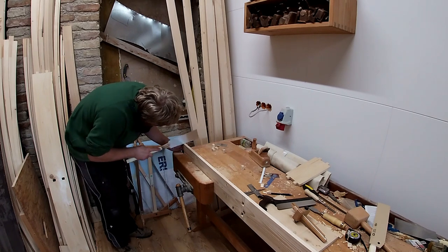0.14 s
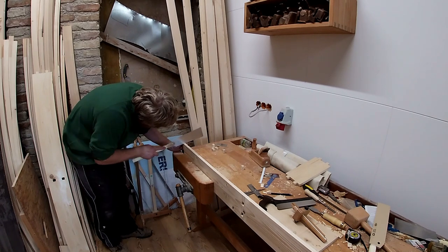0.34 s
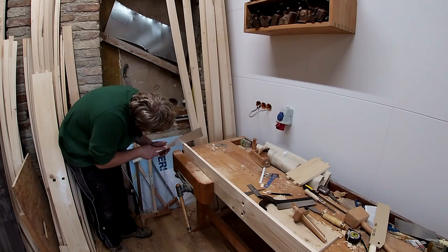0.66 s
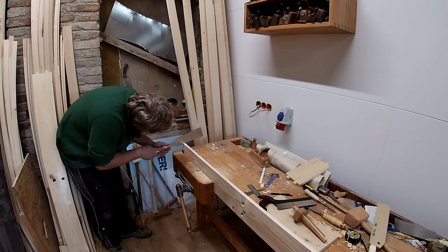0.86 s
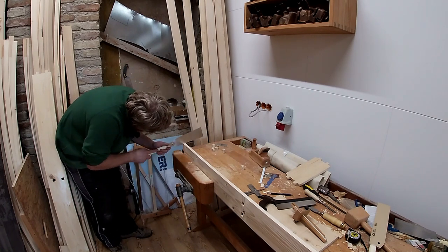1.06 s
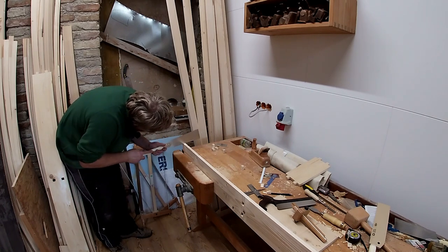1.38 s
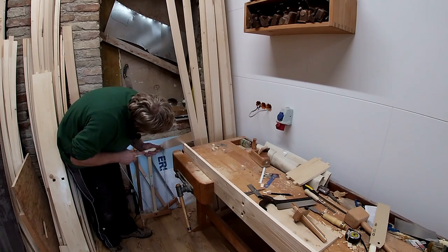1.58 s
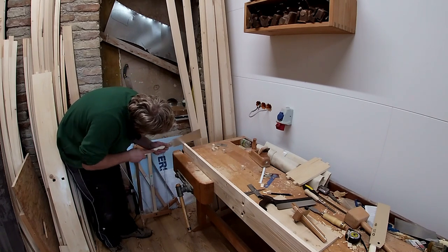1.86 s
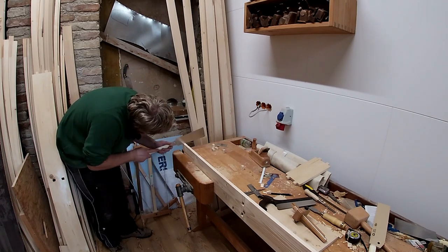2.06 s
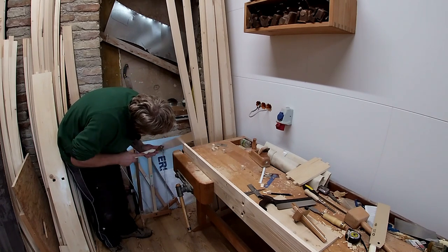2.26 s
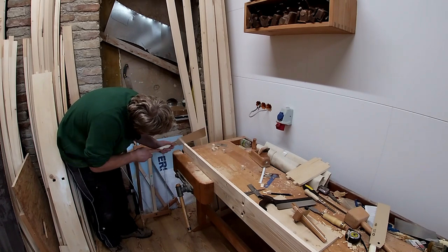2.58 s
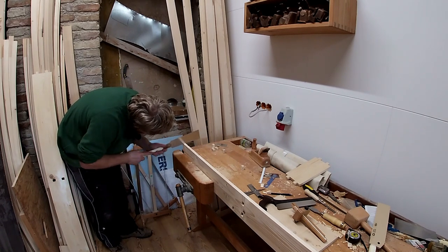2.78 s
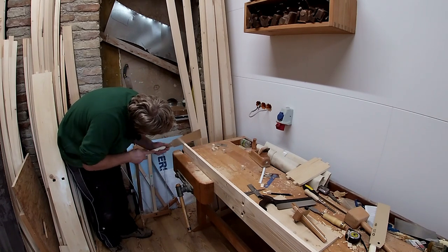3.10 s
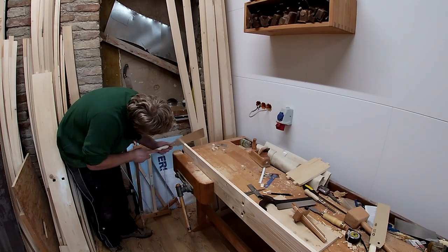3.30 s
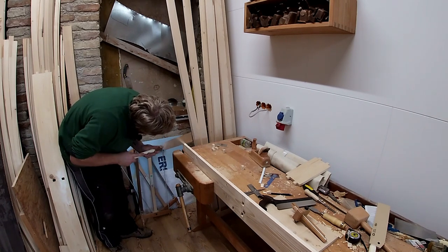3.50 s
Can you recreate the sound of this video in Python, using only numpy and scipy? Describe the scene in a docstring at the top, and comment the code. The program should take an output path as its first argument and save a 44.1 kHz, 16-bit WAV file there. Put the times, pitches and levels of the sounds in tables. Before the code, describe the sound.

A hand saw cuts a wooden board at a workbench. A quieter rasping stroke fades by 0.45 s; small woody knocks and a light hissing drag follow, with a very faint high whistle near 1.2 s. From 1.3 s to the end, stronger uneven strokes grate and buzz, peaking around 1.4, 2.1 and 3.35 s, with hard tooth catches and low board chatter. Close pickup, small room, short reflections.

```python
"""Rasp on a clamped board

A rasp works back and forth on a board clamped to a workbench in a small workshop.
Teeth tear fibres as dense grains through board and rasp responses; the board chatters near 145 Hz under load.
The pause after the first stroke holds small knocks on wood, a light drag of the rasp and a faint whistle.
Hard catches of the teeth punctuate the strokes; bench shake, room tone and wall reflections surround it."""
import sys
import numpy as np
from scipy import signal
from scipy.fft import rfft, irfft, next_fast_len
from scipy.io import wavfile
from scipy.ndimage import uniform_filter1d, map_coordinates

SR = 44100
rng = np.random.default_rng(int(sys.argv[2]) if len(sys.argv) > 2 else 0)


def master_out(mix):
    """Clip the mix to full scale and print it as 16-bit PCM to the path in sys.argv[1]."""
    frames = np.transpose(np.atleast_2d(mix))
    ceiling = np.clip(frames, -1, 1)
    pcm = np.round(ceiling * 32767).astype(np.int16)
    wavfile.write(sys.argv[1], SR, pcm)


def field_ratio(decibels):
    """Amplitude ratio for a level in dB (20 dB per decade); scalars and array-likes work."""
    return 10 ** (np.asarray(decibels, dtype=float) / 20)


N = 160965

# quiet room tone, middle and side: f/Hz, relative level per Hz/dB
ROOM_TONE = [(25, 5), (150, -1), (298, -4), (450, 10.5), (949, -4), (4780, -9.5), (9000, -20), (15600, -44)]
SIDE_TONE = [(25, -1), (300, -1), (15000, -8)]
# decay of the wall reflections: f/Hz, t60/s
WALL_DECAY = [(150, 0.49), (1000, 0.29), (4000, 0.29), (12000, 0.22)]
# diffuse side colour, before its trim: f/Hz, side over mid/dB
SIDE_COLOUR = [(60, -19), (150, -44.5), (400, -42), (1200, -30), (2400, -19), (8000, -7), (15000, 4)]
# colour of the bench shake: f/Hz, relative level/dB
SHAKE_COLOUR = [(20, -33), (40, -9), (70, -4.5), (100, 3.5), (130, -29.5)]
# faint whistle before the run of strokes: t/s, level/dB, f/Hz
WHISTLE = [(1.145, -70, 10450), (1.246, -69, 10340), (1.285, -72, 9750)]
# light drag of the rasp: t/s, level/dB
DRAG_LEVEL = [(.875, -63), (.905, -57), (1.04, -55), (1.065, -52), (1.13, -55.5), (1.165, -75)]
# colour of that drag: f/Hz, relative level per Hz/dB
DRAG_TIMBRE = [(200, -16), (500, -4.5), (1300, -9.5), (2600, -15), (4500, -7.5), (8500, -13), (15600, -24)]
# board and bench resonances: f/Hz, width/Hz, relative level/dB
BOARD_MODES = [(263.5, 39, -1), (331, 21, 2), (397, 18.5, -1), (437, 15.7, 4.5), (508.6, 45.5, -0.5),
               (650.4, 26, 6), (822, 86, -8.5), (980, 72, -3.5), (1085, 79, -4), (1291, 65, -1),
               (1744, 310, -18.5), (2407, 110, -16), (3790, 176, -23.5), (5220, 50, -28)]
# what passes between the resonances: f/Hz, relative level/dB
BETWEEN_MODES = [(90, -53), (130, -37), (250, -6), (700, -14), (1400, -18.5), (2500, -29.5), (5000, -57.5)]
# one resonance that rings only with the lowered ones: f/Hz, width/Hz, relative level/dB
LOWERED_MODE = (374, 26, 8)
# small bumps on wood: t/s, level before trim/dB, brightness/(dB per octave), contact/ms
WOOD_KNOCKS = [(0.5245, -27, 4.5, 1.84), (0.6532, -26.5, 3.5, 1.82), (0.927, -35.5, 0, 13.7),
               (1.053, -34.5, 8, 8), (1.152, -27.5, 2.5, 9), (1.242, -34.5, 4, 4.8)]
# teeth catching hard in the wood, same columns
TOOTH_CATCHES = [(0.256, -21, 4.8, 3.6), (1.289, -25, 3.04, 11), (1.438, -11.5, 1.29, 2.9),
                 (2.074, -18, 2.6, 4), (2.687, -23, 2.97, 4), (3.282, -25, 2.8, 3.36)]
# rasp colour: f/Hz, relative level per Hz/dB
RASP_COLOUR = [(1180, -75), (2000, -7), (2440, 1.5), (2950, -7), (3750, -7.5), (4120, -7), (5710, -9.5),
               (10500, -21), (13000, -32), (15600, -37)]
# chatter overtones: multiple of the chatter pitch, mean level over the fundamental/dB
OVERTONES = [(2, -14.5), (3, -18.5)]
# rasp pressure, first stroke then the run of strokes: t/s, level before trim/dB,
# treble over it before trim/dB
STROKE_PRESSURE = [
    [(0.0, -38.5, -18), (0.056, -33, -11), (0.228, -30.5, -10.5), (0.252, -28.5, -12), (0.36, -45, -9.5),
     (0.415, -49.5, -3.5), (0.44, -51, -19)],
    [(1.292, -36.5, -4.5), (1.32, -27, -11), (1.42, -17.5, -19.5), (1.44, -22, -7.5), (1.46, -20, -22),
     (1.56, -24.5, -14.5), (1.65, -38, -17), (1.69, -33, -10.5), (1.79, -24, -17.5), (1.95, -26, -16),
     (1.98, -20.5, -21.5), (2.03, -34.5, -39), (2.05, -36, -19), (2.1, -20, -14), (2.12, -14, -21),
     (2.28, -26.5, -18), (2.36, -42, -18), (2.43, -40, -8.5), (2.5, -33.5, -15.5), (2.55, -36.5, -11.5),
     (2.59, -32.5, -15), (2.67, -51, -12), (2.72, -25.5, -18), (2.8, -23.5, -16), (2.9, -26.5, -15.5),
     (2.96, -31.5, -30), (2.98, -36.5, -14), (3.07, -32.5, -9.5), (3.17, -31, -19), (3.27, -40.5, -16),
     (3.33, -18.5, -18.5), (3.42, -20.5, -20), (3.58, -39, -19), (3.65, -36.5, -8.5)],
]
# lowest board mode, same two spans: t/s, level/dB, f/Hz
CHATTER_PATH = [
    [(0.0, -37, 158), (0.046, -33, 156.5), (0.138, -24, 153.9), (0.356, -29, 154), (0.5, -63, 160.2)],
    [(1.27, -60, 145.9), (1.31, -34.5, 146.2), (1.36, -20.5, 145.5), (1.61, -32.5, 155.3),
     (1.8, -30.5, 154.4), (1.87, -36, 147.8), (1.96, -18, 151.9), (2.06, -28.5, 149.1), (2.1, -13.5, 138.7),
     (2.13, -25.5, 134.9), (2.2, -14, 140.1), (2.28, -19.5, 140.4), (2.35, -38, 149.7), (2.65, -46.5, 157),
     (2.73, -33, 143.9), (2.83, -15, 143.1), (2.89, -18.5, 143.1), (3.03, -35.5, 155.4), (3.26, -38, 153.9),
     (3.32, -24.5, 145.5), (3.41, -13, 143), (3.52, -30.5, 142), (3.65, -48, 153.2)],
]
# second board mode, same two spans: t/s, level/dB
SECOND_LEVEL = [
    [(0.0, -49), (0.036, -30), (0.302, -30.5), (0.5, -61)],
    [(1.27, -59), (1.3, -35.5), (1.39, -18.5), (1.58, -24), (1.69, -40), (1.79, -15.5), (1.84, -35.5),
     (1.99, -22), (2.06, -34.5), (2.11, -21), (2.14, -30.5), (2.6, -39), (2.67, -47), (2.7, -32),
     (2.87, -25.5), (2.93, -36.5), (3.28, -35), (3.32, -19.5), (3.62, -48), (3.65, -34)],
]

SECOND_HZ = 207.7


def unit(x):
    """Scaled to rms 1."""
    return x / np.sqrt(np.mean(x ** 2) + 1e-20)


def along(points, hz):
    """(f/Hz, value) points read on a log frequency axis."""
    f, v = np.transpose(points)
    return np.interp(np.log(hz + 1), np.log(f + 1), v)


def curves(rows):
    """One value per sample for each column after the time."""
    s, *cols = np.transpose(rows)
    return [np.interp(np.arange(N) / SR, s, c) for c in cols]


def lifted(spans):
    """Joins the stroke tables, silencing them while the rasp is off the wood."""
    first, run = spans
    off = [(s, -90, *row[2:]) for s, row in ((.56, first[-1]), (1.25, run[0]))]
    return curves(list(first) + off + list(run))


def wobble(rate):
    """A smooth random curve, rate knots a second."""
    knots = rng.standard_normal(int(N * rate / SR) + 4)
    return map_coordinates(knots, [np.arange(N) * rate / SR])


def filtered(x, response):
    """x shaped by a complex response of frequency."""
    m = next_fast_len(N + SR // 2)
    return irfft(rfft(x, m) * response(np.fft.rfftfreq(m, 1 / SR)), m)[..., :N]


def coloured(x, points):
    """x through a (f/Hz, level/dB) colour, brought to rms 1."""
    return unit(filtered(x, lambda f: field_ratio(along(points, f))))


def modes(f, table):
    """Causal response of (f/Hz, width/Hz, level/dB) resonances in alternating polarity."""
    total = 0
    for k, (c, w, db) in enumerate(table):
        total = total + (-1) ** k * field_ratio(db) * 1j * f * w / (c * c - f * f + 1j * f * w)
    return total


def board(f):
    """The board's modes, thinned in the bass, plus what passes between them."""
    return modes(f, BOARD_MODES) * f ** 2 / (f ** 2 + 220 ** 2) + field_ratio(along(BETWEEN_MODES, f))


def grains(rate, spread_db):
    """Random clicks of scattered size and polarity, rate a second, rms 1."""
    u, size, sign = rng.random(N), rng.standard_normal(N), np.sign(rng.standard_normal(N))
    return unit((u < rate / SR) * sign * field_ratio(spread_db * np.clip(size, -2, 2)))


def room_tone(colour, db):
    """Quiet coloured noise with a slowly wavering level."""
    return field_ratio(db + 1.1 * wobble(7.9)) * coloured(rng.standard_normal(N), colour)


def room(x):
    """Wall answer; each frequency dies at its own speed, and two tails blend at random."""
    hz, t, z = signal.stft(rng.standard_normal((2, SR // 2)), SR, nperseg=256)
    decay = field_ratio(-60 * t / along(WALL_DECAY, hz)[:, None])
    tails = signal.istft(z * decay, SR, nperseg=256)[1]
    blend = np.pi / 2 * wobble(4)
    parts = np.pad(x * [np.cos(blend), np.sin(blend)], ((0, 0), (200, 0)))
    return signal.fftconvolve(parts, tails / np.linalg.norm(tails[0]), axes=1).sum(axis=0)[:N]


def bench_shake():
    """Low noise from the shaking bench partly follows the rasp's pressure."""
    stroke_db, _ = lifted(STROKE_PRESSURE)
    level_db = -52 + 0.46 * (np.maximum(stroke_db, -60) + 27.5)
    return coloured(rng.standard_normal(N), SHAKE_COLOUR) * field_ratio(level_db + 4.0 * wobble(8.62))


def whistle():
    """A thin, falling sine whose level flickers."""
    level_db, hz = curves(WHISTLE)
    s = np.arange(N) / SR
    sounding = 1. * (s > WHISTLE[0][0]) * (s < WHISTLE[-1][0])
    on = uniform_filter1d(sounding, size=300)  # soft edges
    return on * field_ratio(level_db + 3 * wobble(40)) * np.sin(2 * np.pi * np.cumsum(hz) / SR)


def drag():
    """The rasp slides back without pressure: a thin, slightly gritty hiss."""
    level_db, = curves([(.8, -100)] + list(DRAG_LEVEL) + [(1.24, -100)])
    hiss = rng.standard_normal(N) + 1.1 * grains(1600, 2.9)
    return field_ratio(level_db + 2.0 * wobble(29.9)) * coloured(hiss, DRAG_TIMBRE)


def knocks_and_catches():
    """A short rough contact, soft or hard, rings the board's modes."""
    push = 1.64  # smooth shove against a roughness of 1
    out, t = np.zeros(N), np.arange(SR // 8) / SR
    for s, db, bright_db, ms in list(WOOD_KNOCKS) + list(TOOTH_CATCHES):
        u = t * 1000 / max(ms, 1)
        blow = np.zeros(N)
        blow[round(s * SR):][:len(t)] = u * np.exp(-u * u) * (push + rng.standard_normal(len(t)))

        def struck(f):
            tilt = field_ratio(bright_db * np.log2(np.clip(f, 150, 9000) / 400))
            return tilt * (board(f) + modes(f, [(SECOND_HZ, 60, 3)]) + modes(f, [(4960, 3500, -51.5)]))

        rung = filtered(blow, struck)
        out += field_ratio(db - 3.0) * rung / np.abs(rung).max()
    return out


def board_body(torn):
    """Torn grains drift at random between two mode sets; the first stroke leans to the lowered one."""
    shift = 0.038  # frequency ratio above 1 between the two sets
    first_lean = 3.7
    lean = 3 * wobble(4.02) + 2.46 - first_lean * (np.arange(N) < SR // 2)
    share = 1 / (1 + np.exp(lean))
    usual = filtered(torn * np.sqrt(1 - share), board)
    lowered = filtered(torn * np.sqrt(share), lambda f: board(f * (1 + shift)) + modes(f, [LOWERED_MODE]))
    return unit(usual + lowered)


def low_mode(torn, hz, width_hz):
    """Torn grains ring one low mode, its resonance applied twice."""
    return unit(filtered(torn, lambda f: modes(f, [(hz, width_hz, 0)]) ** 2))


def board_chatter(torn, turn, locked):
    """Weak chatter is noise in the lowest mode; strong chatter locks into a wavering hum with overtones."""
    loose = low_mode(torn, 150, 16)
    hum = np.cos(turn)
    for k, db in OVERTONES:
        hum = hum + field_ratio(db + 1.7 * wobble(23.86)) * np.cos(k * turn + wobble(14))
    hum = np.sqrt(2) * hum * field_ratio(1 * wobble(30.63))
    return np.sqrt(locked) * hum + np.sqrt(1 - locked) * loose


def rasp_fizz(torn, bite, fizz_db):
    """Torn fibres and finer grains fizz in the rasp; its top treble swings wider than the rest."""
    fizz = coloured(0.32 * torn + bite * grains(6000, 2.5), RASP_COLOUR)
    air = filtered(fizz, lambda f: 1 / (1 + (9050 / (f + 1)) ** 4))  # above about 9 kHz
    return fizz + air * (field_ratio(0.14 * np.clip(fizz_db + 49, -30, 10)) - 1)


def rasp():
    """Torn fibres ring board and rasp; the bite pulses with the board's chatter."""
    stroke_db, treble_db = lifted(STROKE_PRESSURE)
    chatter_db, chatter_hz = lifted(CHATTER_PATH)
    second_db, = lifted(SECOND_LEVEL)
    lock_db, wander_hz, cycle_bite, jerk_db = -34, 3.99, 0.29, 1.16
    turn = 2 * np.pi * np.cumsum(chatter_hz + wander_hz * wobble(40)) / SR
    locked = 1 / (1 + field_ratio(2 * (lock_db - chatter_db)))  # half locked at lock_db
    bite = (1 + cycle_bite * locked * np.cos(turn)) * field_ratio(jerk_db * wobble(44.914))
    torn = bite * grains(1800, 4)
    body = board_body(torn)
    second = low_mode(torn, SECOND_HZ, 45.3)
    chatter = board_chatter(torn, turn, locked)
    fizz = rasp_fizz(torn, bite, stroke_db + treble_db)
    bright = field_ratio(stroke_db) * (field_ratio(-0.5) * body + field_ratio(treble_db - 2.0) * fizz)
    return bright, field_ratio(chatter_db) * chatter + field_ratio(second_db) * second


def scene():
    """Two close microphones: nearly mono, with a diffuse side that grows in the treble."""
    bright, low = rasp()
    low = low + bench_shake()
    near = bright + knocks_and_catches() + drag() + whistle()
    mid = near + low + field_ratio(-5) * room(near) + room_tone(ROOM_TONE, -60.5)
    diffuse = filtered(room(near + low), lambda f: field_ratio(along(SIDE_COLOUR, f) - 3.5))
    side = diffuse + room_tone(SIDE_TONE, -74.5)
    return np.array([mid + side, mid - side])


def roll_off(x):
    """The treble ends steeply here."""
    return signal.sosfilt(signal.butter(12, 15770, fs=SR, output="sos"), x)


def record(dry):
    """Cuts everything from 15770 Hz up and delivers the finished mix."""
    mix = filtered(dry, lambda f: f < 15770)
    return roll_off(mix)


dry = scene()
out = record(dry)
master_out(out)
```